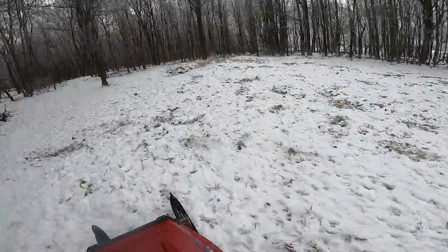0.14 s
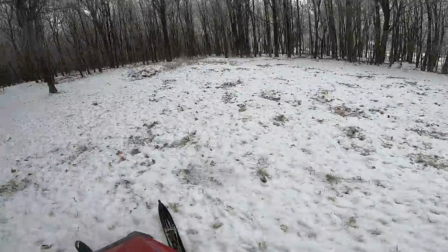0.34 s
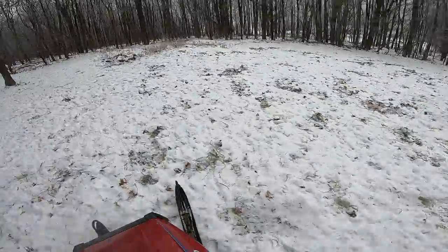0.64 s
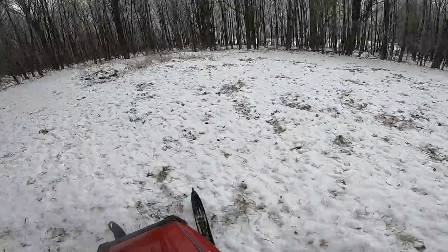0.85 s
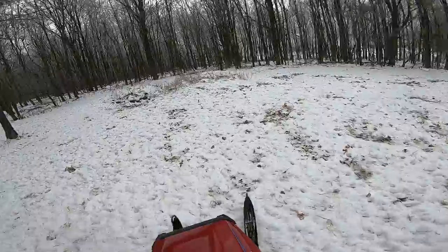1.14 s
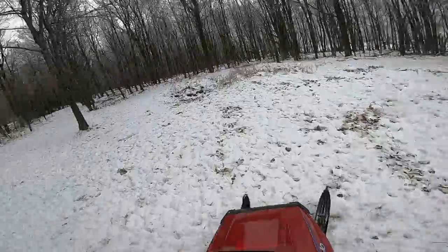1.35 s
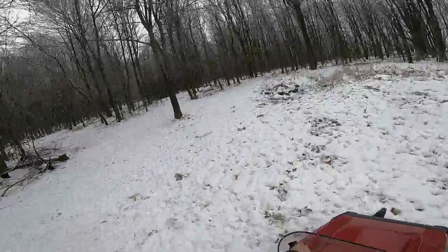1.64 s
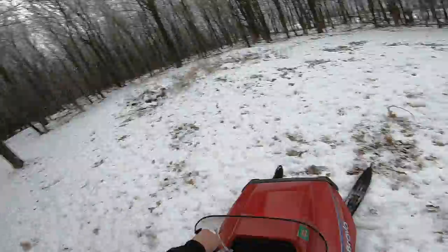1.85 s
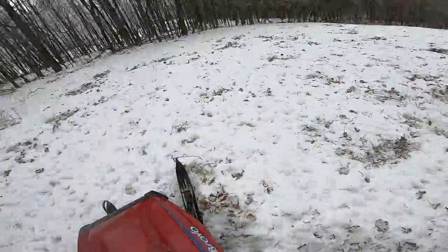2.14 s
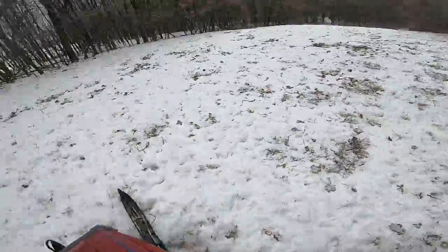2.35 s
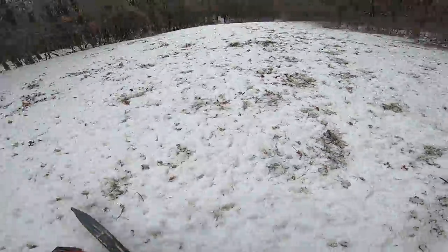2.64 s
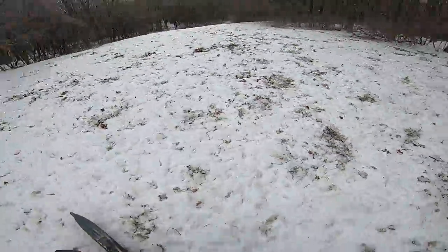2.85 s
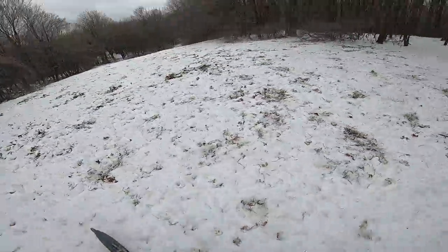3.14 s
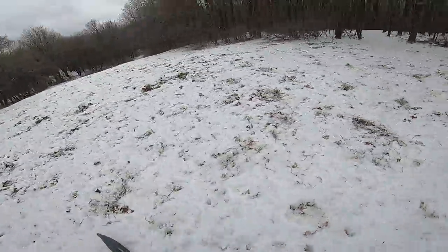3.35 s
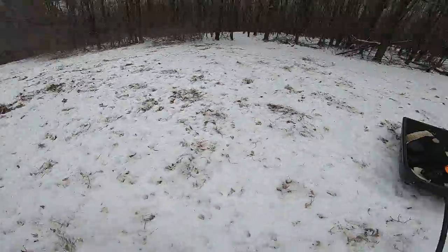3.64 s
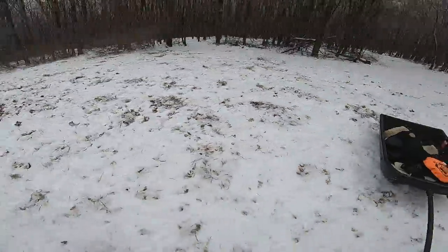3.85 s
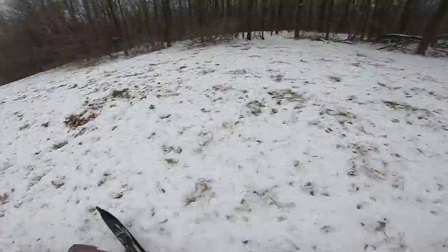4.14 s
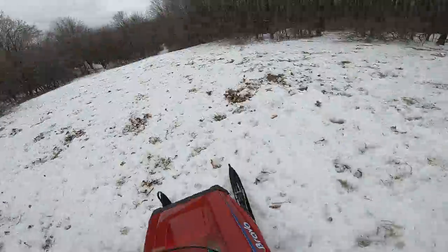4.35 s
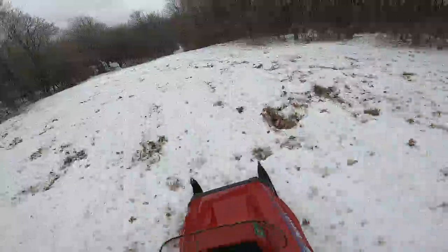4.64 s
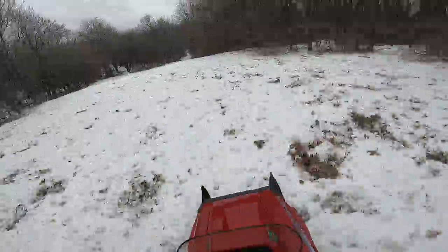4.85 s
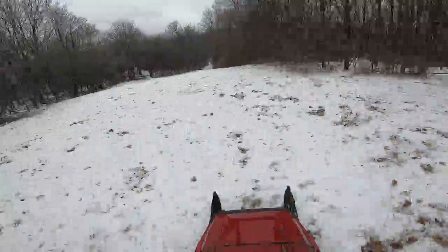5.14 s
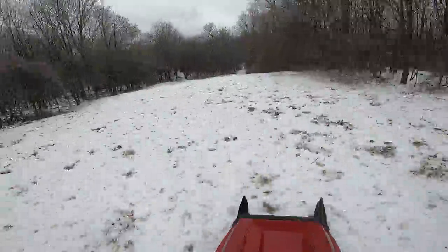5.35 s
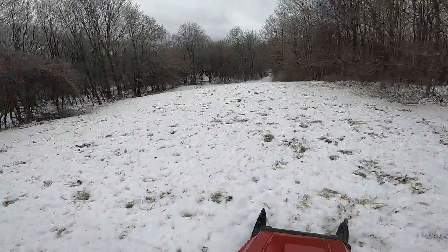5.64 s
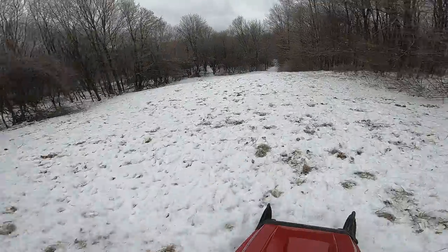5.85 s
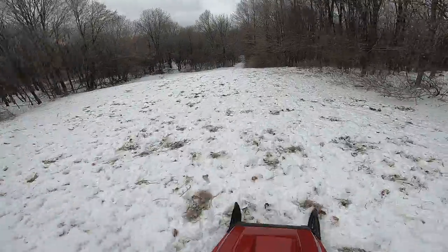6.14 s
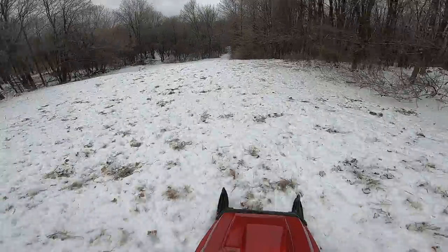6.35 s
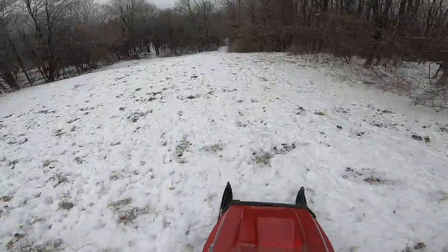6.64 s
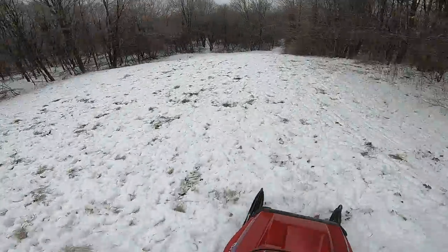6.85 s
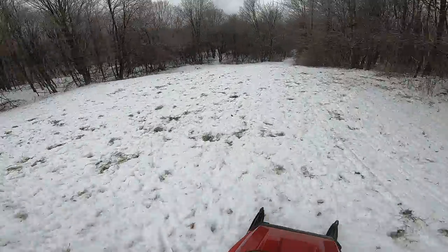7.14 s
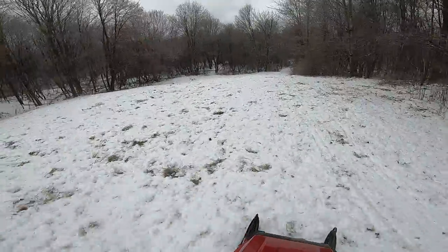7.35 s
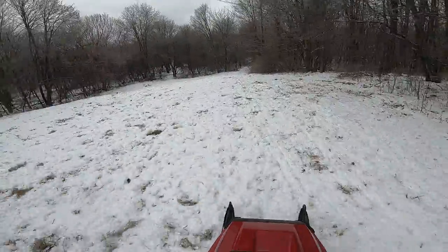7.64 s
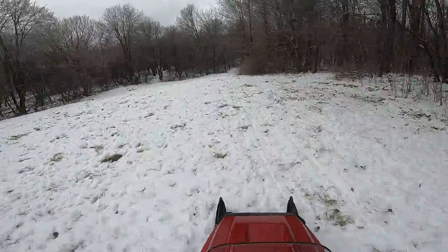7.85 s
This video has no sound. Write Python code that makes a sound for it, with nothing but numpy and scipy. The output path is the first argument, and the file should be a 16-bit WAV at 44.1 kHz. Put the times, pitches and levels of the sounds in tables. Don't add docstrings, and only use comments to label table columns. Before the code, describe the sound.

Outdoors on a snowy clearing, a rider's helmet microphone hears a single-cylinder two-stroke snowmobile close below. From 0 to 0.6 s the exhaust sinks in pitch and stutters as it catches, then settles into a firm, raspy low buzz. It rises until about 1.5 s, dips near 2.4 s, then climbs steadily from 3 s to its highest pitch around 5.3 s. Belt, fan and track make a steady rush under the hood, with faint whine, fine high fizz and grainy ski hiss, lifted slightly by small bumps. Around 5.5 s the throttle closes: the fizz drops away, the pitch falls until about 7 s, and the weaker exhaust comes in irregular bursts that catch and fade roughly eight times a second. Low wind buffets strongly near 5.4 and 6.8 s. The exhaust thins most around 7.3 s, then putters slightly higher and stronger to the end at 8 s.

```python
import sys
import numpy as np
from scipy import signal
from scipy.fft import rfft, irfft, next_fast_len
from scipy.io import wavfile
from scipy.ndimage import uniform_filter1d, minimum_filter1d, map_coordinates

SR = 44100
rng = np.random.default_rng(int(sys.argv[2]) if len(sys.argv) > 2 else 0)


def master(y):
    cut = np.clip(np.atleast_2d(y).T, -1, 1)
    pcm = np.round(cut * 32767)
    wavfile.write(sys.argv[1], SR, pcm.astype(np.int16))


def level_to_linear(level):
    exponent = np.asarray(level, float) / 20
    return 10 ** exponent


N = 353241


def unit(x):
    return x / np.sqrt(np.mean(x ** 2) + 1e-20)


def between(pair, share):
    return pair[0] + (pair[1] - pair[0]) * share


def along(points, hz):
    f, v = np.transpose(points)
    return np.interp(np.log(hz + 1), np.log(f + 1), v)


def curves(rows):
    s, *cols = np.transpose(rows)
    return [np.interp(np.arange(N) / SR, s, c) for c in cols]


def wobble(rate):
    knots = rng.standard_normal(int(N * rate / SR) + 4)
    return map_coordinates(knots, [np.arange(N) * rate / SR])


def filtered(x, response):
    m = 2 * next_fast_len(N // 2 + SR // 4)
    return irfft(rfft(x, m) * response(np.fft.rfftfreq(m, 1 / SR)), m)[..., :N]


def causal(db):
    cepstrum = irfft(np.log(level_to_linear(db)))
    half = len(cepstrum) // 2
    folded = np.r_[cepstrum[0], 2 * cepstrum[1:half], cepstrum[half], np.zeros(half - 1)]
    return np.exp(rfft(folded))


def smooth_field(shape, bins, frames, axis):
    field = uniform_filter1d(rng.standard_normal(shape), size=bins, axis=axis)
    return unit(uniform_filter1d(field, size=frames, axis=axis + 1))


def rush(response, patchy_db):
    z = signal.stft(rng.standard_normal(N), nperseg=1024)[2]
    patches = level_to_linear(patchy_db * smooth_field(z.shape, 3, 7, axis=0))
    noise = signal.istft(z * patches, nperseg=1024)[1][:N]
    return unit(filtered(noise, response))


def coloured(points, patchy_db):
    return rush(lambda hz: level_to_linear(along(points, hz)), patchy_db)


def low_pass(x, corner_hz, power):
    return filtered(x, lambda hz: 1 / (1 + (hz / corner_hz) ** power))


# (time [s], turns per second [Hz])
SHAFT_SPEED = [(0, 64.7), (.2, 60.48), (.32, 55.49), (.6, 53.93), (1, 59.67), (1.49, 65.57), (1.76, 65.56),
               (2.05, 57.85), (2.4, 54.74), (3.1, 56.01), (4.19, 63.85), (4.8, 70), (5.3, 74.9),
               (5.6, 74.12), (6.3, 68.54), (6.95, 59.6), (7.3, 61.18), (8.01, 63.34)]


def crankshaft():
    speed_hz = curves(SHAFT_SPEED)[0]
    return np.cumsum(speed_hz) / SR, speed_hz


# (time [s], strength [dB], load [0-1]); load sharpens the pulse and steadies the firing
COMBUSTION = [(0, -14.5, 0), (.25, -3.5, 0.08), (.5, 3, .35), (.65, -2.5, 0.92), (1.15, -3, 1),
              (1.7, -3.5, 0.66), (2.1, 0, 0.45), (2.55, 0.5, 0.82), (3.3, 1, 0.64), (4.1, -2.5, 0.79),
              (4.9, -2.5, 0.59), (5.4, -6.5, 0.54), (5.8, -9.5, 0), (6.5, -7, 0.02), (7, -7, .05),
              (7.3, -17.5, 0.2), (7.65, -9.5, 0), (8.01, -4, 0.37)]
# (time [s], depth of the fade [dB], fade length [s])
CATCHES = [(0.086, 7, 0.05), (0.192, 7.5, 0.11), (0.241, 9.5, .05), (0.326, 8, .045), (.413, 8.5, 0.058),
           (0.525, 10, 0.058), (0.568, 4, 0.08), (1.936, 8.5, .03), (5.291, 9.5, 0.019),
           (5.504, 11.5, 0.011), (5.636, 4.5, 0.065), (5.846, 7.5, .09), (5.98, 7, 0.091),
           (6.099, 6, 0.091), (6.224, 3.5, .1), (6.354, 8, 0.11), (6.481, 7.5, 0.044), (6.571, 8, 0.031),
           (6.704, 8, 0.073), (6.821, 7.5, 0.05), (6.927, 10.5, .06), (7.038, 5.5, 0.12), (7.156, 4, 0.17),
           (7.282, 16, 0.15), (7.394, 13, 0.035), (7.582, 13, .1), (7.7, 13, 0.036), (7.806, 3, 0.069),
           (7.882, 5, 0.04), (8.004, 8.5, 0.073)]
# (frequency [Hz], level of a firing order [dB])
PIPE = [(20, -53), (54, -20), (72, -11.5), (110, -18), (143, -15), (163, -7), (187, -5), (199, -9),
        (222, -11.5), (246, -19), (264, -14), (390, -34), (470, -27.5), (580, -48.5), (900, -91)]
# (load [0-1], level [dB])
THUMP = [(0, 5.5), (.5, 1), (1, 3.5)]
GROWL_DB, BARK_DB = (-17, -0.5), (-18, 7.5)
ROUGH, STEADY_LOAD = (.17, .045), .35
CHAMBER_HZ, CHAMBER_WIDTH_HZ, LEAD_RAD = 250, 60, 1.1


def exhaust(turns):
    strength_db, load = curves(COMBUSTION)
    thump_db = np.interp(load, *np.transpose(THUMP))
    growl_db, bark_db = between(GROWL_DB, load), between(BARK_DB, load)
    rough = between(ROUGH, np.clip(load / STEADY_LOAD, 0, 1))

    at = np.interp(np.arange(.3, turns[-1]), turns, np.arange(N))
    sample = at.astype(int)
    chance = rng.standard_normal((len(at), 2))
    uneven = np.clip(rough[sample], 0, 1)
    s, depth_db, length = np.transpose(CATCHES)
    faded = 1 + (at[:, None] / SR + 0.0092 - s) / length
    fade_db = np.sum(depth_db * np.clip(3.5 * faded, 0, 1) * (faded < 1), axis=1)
    size = level_to_linear(strength_db[sample] - fade_db + 2.2 * uneven * chance[:, 0]) * SR / 120
    late = np.clip(at + 0.0028 * SR * uneven * chance[:, 1], 0, N - 1).astype(int)
    blows = np.bincount(late, size, N)
    half_turn = ((at[1:] + at[:-1]) / 2).astype(int)
    breath = np.bincount(half_turn, 0.12 * size[:-1], N)

    def pipe_response(hz):
        chamber = CHAMBER_HZ ** 2 - hz * hz + 1j * hz * CHAMBER_WIDTH_HZ
        delay = np.exp(1j * LEAD_RAD) * np.conj(chamber) / chamber
        return causal(along(PIPE, hz)) * delay

    pipe = filtered(blows + low_pass(breath, 300, 6), pipe_response)
    thump = low_pass(pipe, 153, 18)
    bark = pipe - low_pass(pipe, 345, 10)
    growl = pipe - bark - low_pass(pipe, 215, 12)
    raps = filtered(np.bincount(sample, size, N), panels)
    near = pipe + (level_to_linear(thump_db) - 1) * thump + (level_to_linear(growl_db) - 1) * growl + (level_to_linear(bark_db) - 1) * bark
    return scattered(near + level_to_linear(bark_db - 42.5) * raps, rough)


def scattered(x, rough):
    hz, t, z = signal.stft(x, SR, nperseg=2048)
    field = smooth_field((2,) + z.shape, 2, 7, axis=1)
    by_pitch = .5 * np.clip(hz[:, None] / 450, 0, 1) ** 2
    by_roughness = 0.57 * np.clip(np.interp(t, np.arange(N) / SR, rough), 0, .3)
    level, arrival = (by_pitch + by_roughness) * field
    return signal.istft(z * np.exp(0.45 * level + 1j * arrival), SR, nperseg=2048)[1][:N]


# (resonance [Hz], width [Hz], level [dB])
PANELS = [(652, 8.7, -9), (843, 32, -0.5), (1193, 145, -3), (1440, 18, -10.5), (2694, 67, -9),
          (3820, 210, -10)]


def panels(hz):
    modes = sum((-1) ** k * level_to_linear(db) * 1j * hz * width / (centre ** 2 - hz * hz + 1j * hz * width)
                for k, (centre, width, db) in enumerate(PANELS))
    return np.exp(-(hz / 5000) ** 4) * modes


# (time [s], level [dB])
DRAG = [(0.0, -48.5), (0.09, -51), (0.38, -43), (1.2, -38), (1.63, -43), (1.87, -37.5), (2.25, -40),
        (3.39, -39.5), (3.43, -38.5), (5.49, -46), (5.69, -44), (5.78, -48), (6.22, -44.5), (6.58, -47),
        (6.67, -42), (6.96, -47.5), (7.92, -43), (8.01, -47)]
# (time [s], share of the pulling colour [0-1])
PULL = [
    (0, 0.6),
    (.3, 0.98),
    (5.2, 1),
    (5.6, 0),
    (8.01, 0),
]
# (time [s], lift [dB])
BUMPS = [(.45, 6), (1.299, -2), (1.85, 2), (2.1, 1), (2.25, -1.5), (2.8, 3.5), (3.55, 1), (3.719, 4.5),
         (4.28, 4), (4.52, 3.5), (6.15, 0), (7.85, 2)]
BUMP_S, BUMP_SHARES = 0.032, (.4, 0.85, 1.5)
HOOD_SWINGS = 0.53


def running_gear(turns, speed_hz):
    drag_db = curves(DRAG)[0]
    pull = np.clip(curves(PULL)[0], 0, 1)
    t = np.arange(N) / SR
    clods = sum(db * np.exp(-((t - s) / BUMP_S) ** 2) for s, db in BUMPS)
    to_hood, to_hiss, to_fizz = np.outer(BUMP_SHARES, clods)
    snow_db = drag_db + 0.43 * wobble(5.9)
    hood_db = drag_db.mean() + HOOD_SWINGS * (drag_db - drag_db.mean())
    puff = np.cos(2 * np.pi * turns)
    jolts = 0.82 * wobble(22) + 0.95 * wobble(70) + 1.0 * puff
    under_hood = hood_rush(hood_db + to_hood, pull, puff) + cowl_ring(hood_db, pull, speed_hz)
    return under_hood + snow_hiss(snow_db + to_hiss + jolts, pull) + belt_fizz(snow_db + to_fizz, jolts)


def blend(pull, pulling, coasting, patchy_db):
    return (np.sqrt(pull) * coloured(pulling, patchy_db)
            + np.sqrt(1 - pull) * coloured(coasting, patchy_db))


# (frequency [Hz], level [dB per Hz])
HOOD_PULLING = [(200, -13.5), (420, 6), (610, -9.5), (760, -4.5), (1000, -4), (1500, -4), (1900, -3),
                (2300, -13.5), (2660, -20.5), (3200, -23), (6000, -120)]
# (frequency [Hz], level [dB per Hz])
HOOD_COASTING = [(150, -26), (330, 6.5), (620, -2.5), (900, -1), (1300, 1.5), (1900, 2), (2250, -5),
                 (2600, -4.5), (3200, -21), (6000, -120)]


def hood_rush(drag_db, pull, puff):
    hum = level_to_linear(-6.0) * pull * rush(panels, patchy_db=3.0)
    air = blend(pull, HOOD_PULLING, HOOD_COASTING, patchy_db=0.65)
    return level_to_linear(drag_db + 10 + 0.28 * wobble(14) + 0.45 * puff) * (air + hum)


RING_DB = (3.5, -1.5)
RING_DB_PER_HZ, CRUISE_HZ = 0.39, 66.3


def cowl_ring(drag_db, pull, speed_hz):
    def cowl(hz):
        return (230 * hz / (1800 ** 2 - hz * hz + 230j * hz)) ** 2 * (hz < 6000)

    ring_db = drag_db + between(RING_DB, pull) + RING_DB_PER_HZ * (speed_hz - CRUISE_HZ)
    return level_to_linear(ring_db + 1.6 * wobble(9) + 0.85 * wobble(45)) * rush(cowl, patchy_db=1.0)


# (frequency [Hz], level [dB per Hz])
SNOW_PULLING = [(1400, -10.5), (2400, -2.5), (3300, -8), (3800, -11.5), (4250, -5), (4900, -3.5),
                (6200, -5.5), (7300, -16), (8800, -18.5), (11200, -38.5), (12500, -96)]
# (frequency [Hz], level [dB per Hz])
SNOW_COASTING = [(1400, -17.5), (2400, 0), (3300, -4.5), (4300, -6.5), (5200, -4), (5600, -2), (6300, -5),
                 (7300, -19.5), (8800, -21.5), (10000, -33), (11300, -43.5), (12500, -93)]
HISS_DB = (4, 1)


def snow_hiss(snow_db, pull):
    grains = blend(pull, SNOW_PULLING, SNOW_COASTING, patchy_db=1.7)
    return level_to_linear(snow_db + between(HISS_DB, pull)) * grains


# (frequency [Hz], level [dB per Hz])
FIZZ = [(6650, -45.5), (11300, -10), (12000, -2), (12600, 2), (13200, 0.5), (15500, -20.5)]
FIZZ_DB, BELT_SLACK_S = (-51, -23), 5.42
SPRAY_DB = 5.5


def belt_fizz(snow_db, jolts):
    tight = 1 / (1 + np.exp((np.arange(N) / SR - BELT_SLACK_S) / .04))
    spurts = SPRAY_DB * (1 - tight) * wobble(30)
    fizz_db = snow_db + between(FIZZ_DB, tight) + 1.3 * jolts + 1.5 * wobble(3.4) + spurts
    return level_to_linear(fizz_db) * coloured(FIZZ, patchy_db=3.0)


# (multiple of the turn, level [dB])
WHINE = [(10, -47), (12, -46), (16, -45), (24, -44)]
# (frequency [Hz], level [dB])
SHROUD = [(560, -16), (665, 0), (760, -18), (900, -14), (1050, -1), (1200, -3), (1450, 0), (1650, -10)]


def fan(turns):
    tones = 0
    for multiple, db in WHINE:
        phase = 2 * np.pi * multiple * turns + .6 * wobble(25)
        tones = tones + level_to_linear(db + 3 * wobble(3.5)) * np.sin(phase)
    return filtered(tones, lambda hz: level_to_linear(along(SHROUD, hz)))


# (time [s], level [dB])
GUSTS = [(0, -39), (.4, -44), (.65, -45), (1.35, -51), (1.58, -39.5), (1.9, -44.5), (3.4, -56), (3.8, -46),
         (4.8, -45), (5.2, -36), (5.42, -30.5), (5.6, -38), (5.8, -32.5), (6.1, -41), (6.78, -33),
         (7.12, -33), (7.25, -38.5), (8.01, -37)]
# (time [s], peak level [dB], half length [s])
SQUALLS = [
    (5.309, -29.5, 0.052),
    (5.424, -30, 0.081),
    (5.758, -54.5, 0.069),
    (6.551, -45, 0.038),
    (6.79, -25, 0.07),
    (6.96, -39, 0.032),
    (7.994, -38, 0.031),
]
# (frequency [Hz], level [dB per Hz])
BUFFET = [(10, -21.5), (30, -0.5), (60, 5), (130, 7.5), (220, -19), (400, -40), (1000, -120)]
# (frequency [Hz], level [dB per Hz])
FLUTTER = [(100, -46.5), (220, 7), (400, -9), (700, -14), (1300, -41.5), (3000, -120)]


def wind():
    gust_db = curves(GUSTS)[0] + 1.9 * wobble(13)
    lumps = level_to_linear(wobble(28))
    t = np.arange(N) / SR
    squalls = sum(level_to_linear(db) * np.exp(-((t - s) / length) ** 2) for s, db, length in SQUALLS)
    flutter = (level_to_linear(0.89 * gust_db - 1.5) + squalls) * coloured(FLUTTER, patchy_db=2.5)
    buffet = level_to_linear(gust_db + 15.5) * coloured(BUFFET, patchy_db=-5.5)
    return lumps * (buffet + flutter)


def scene():
    turns, speed_hz = crankshaft()
    return (exhaust(turns) + running_gear(turns, speed_hz) + fan(turns) + wind())[None]


def band_limit(x):
    return signal.sosfilt(signal.butter(12, 15620, fs=SR, output="sos"), x)


def record(dry):
    needed = np.minimum(1, 0.5 / (np.abs(dry) + 1e-9))
    lowest = minimum_filter1d(needed, size=1500)
    held = dry * uniform_filter1d(uniform_filter1d(lowest, size=700), size=700)
    held = held * np.clip((N - np.arange(N)) / (.004 * SR), 0, 1)
    mix = filtered(held, lambda hz: (hz < 15620) * hz ** 2 / (hz ** 2 + 14 ** 2))
    return band_limit(mix)


dry = scene()
out = record(dry)
master(out)
```